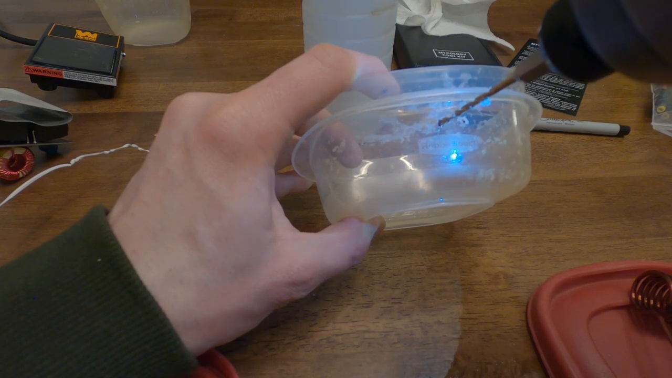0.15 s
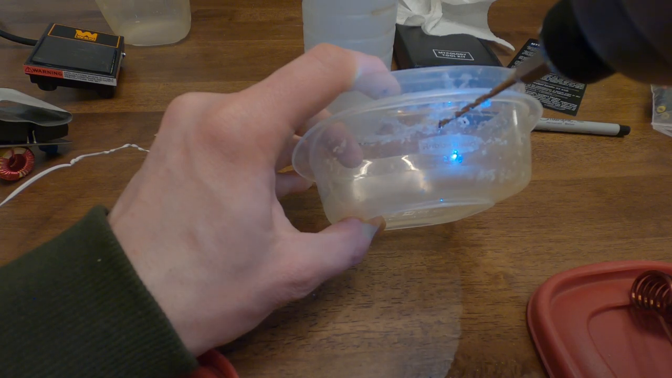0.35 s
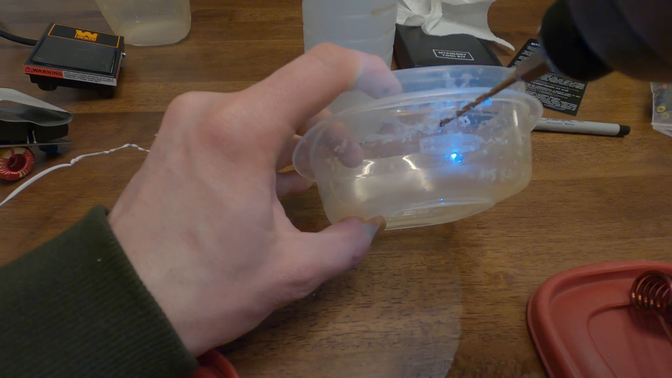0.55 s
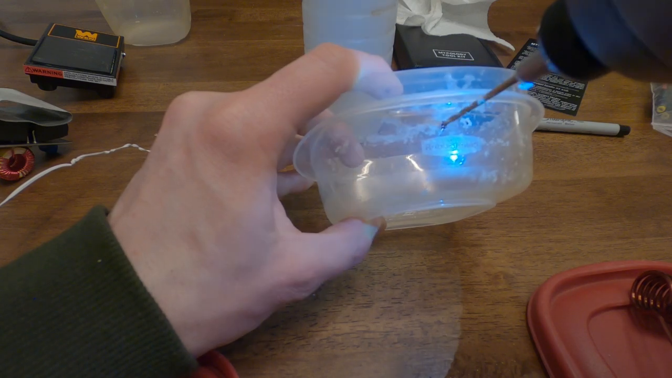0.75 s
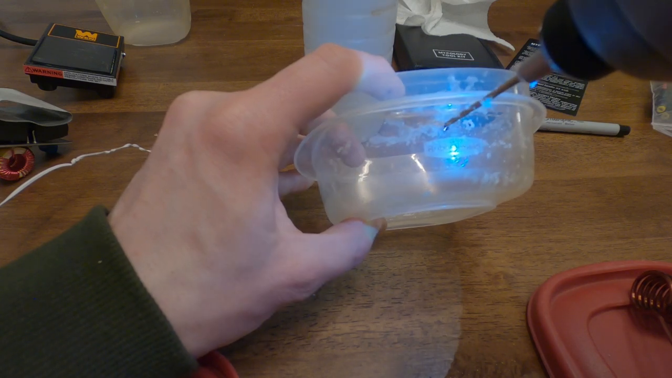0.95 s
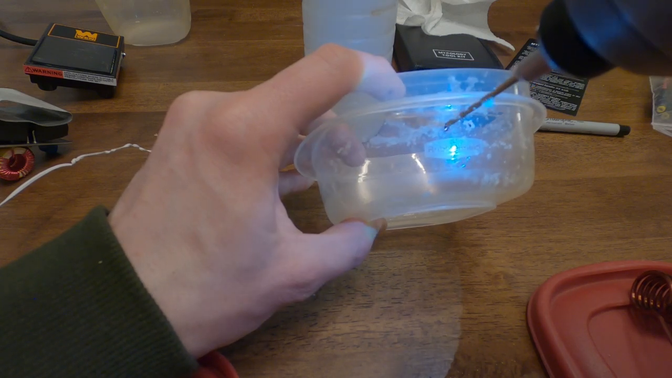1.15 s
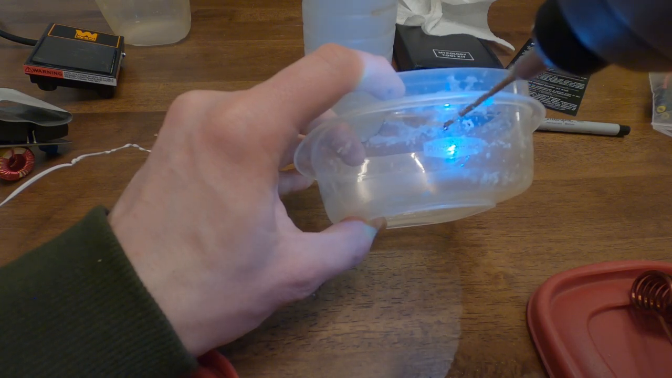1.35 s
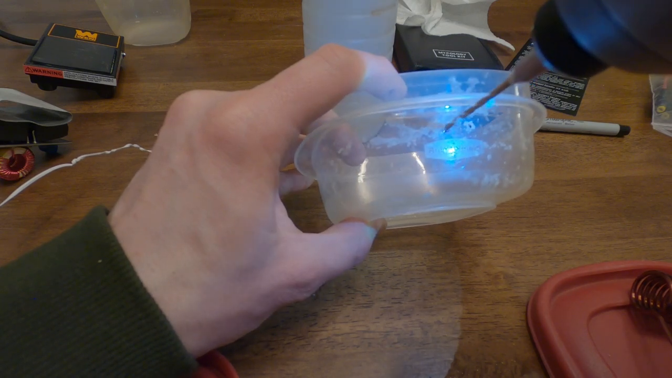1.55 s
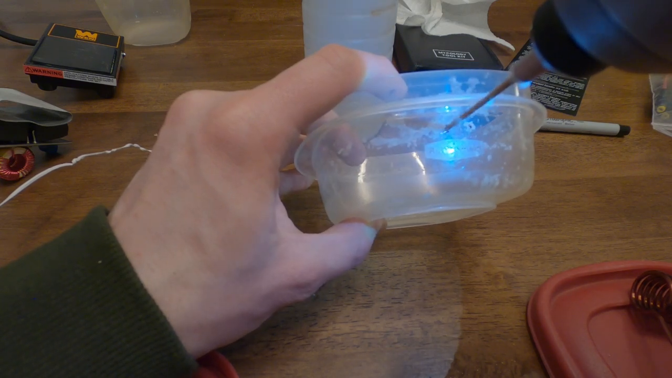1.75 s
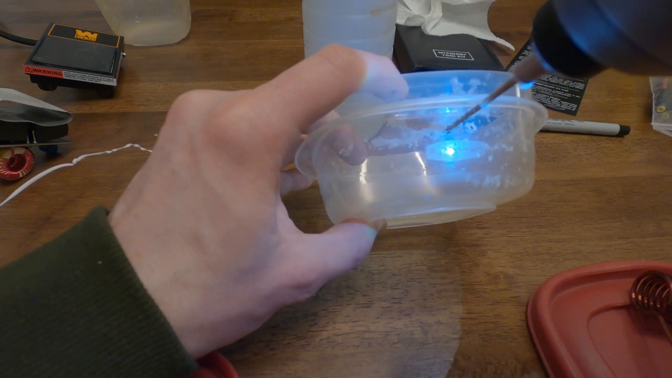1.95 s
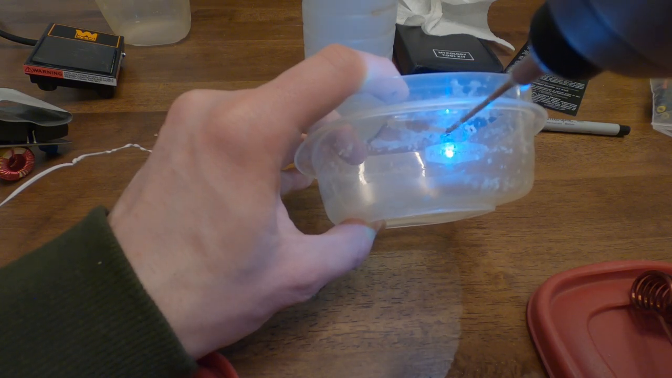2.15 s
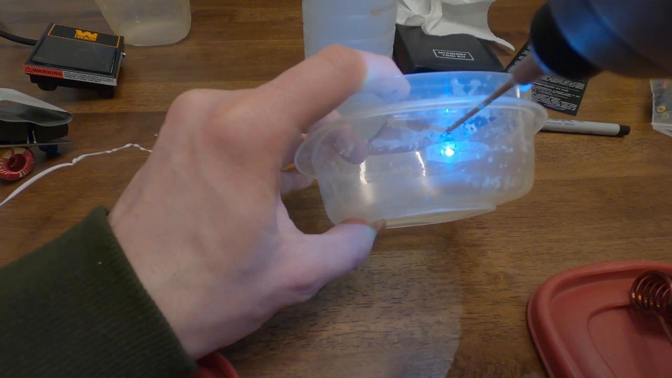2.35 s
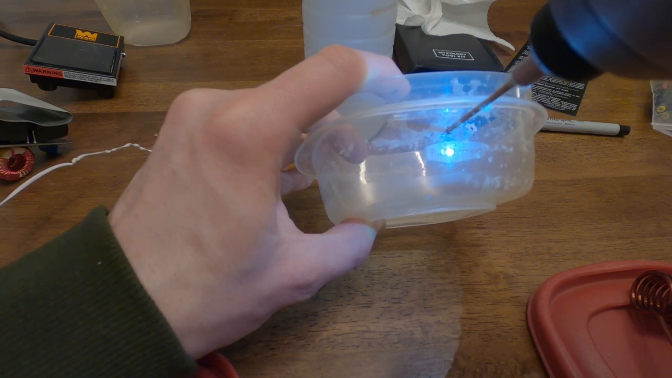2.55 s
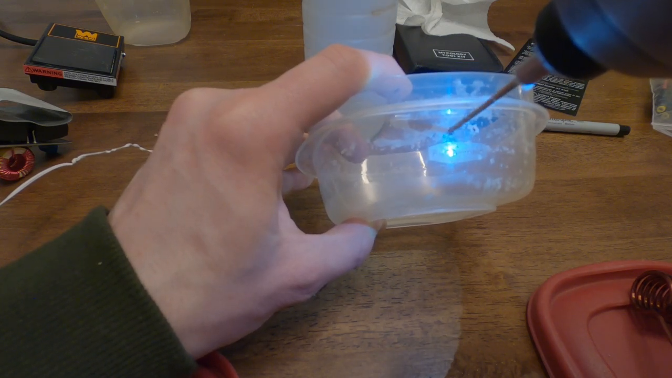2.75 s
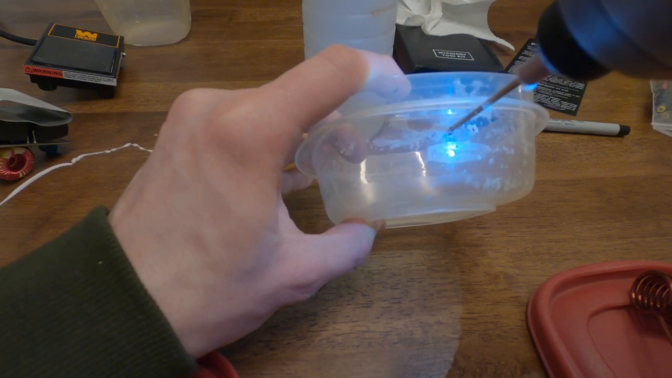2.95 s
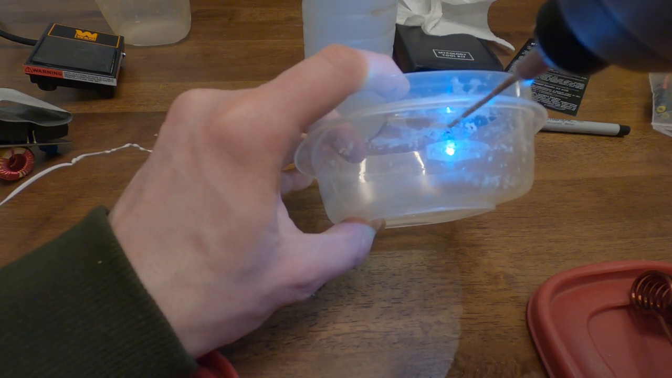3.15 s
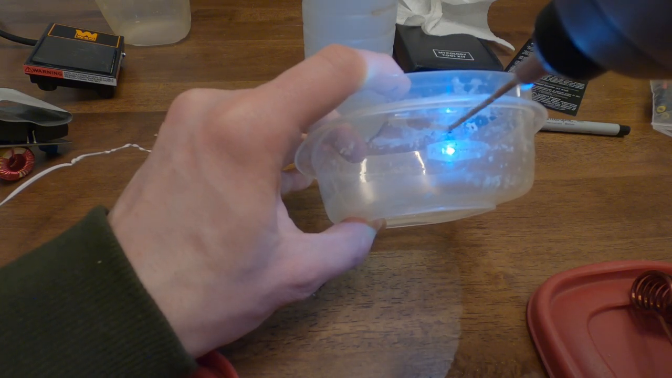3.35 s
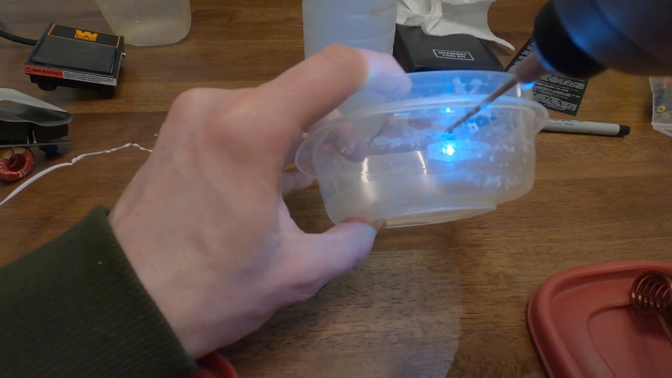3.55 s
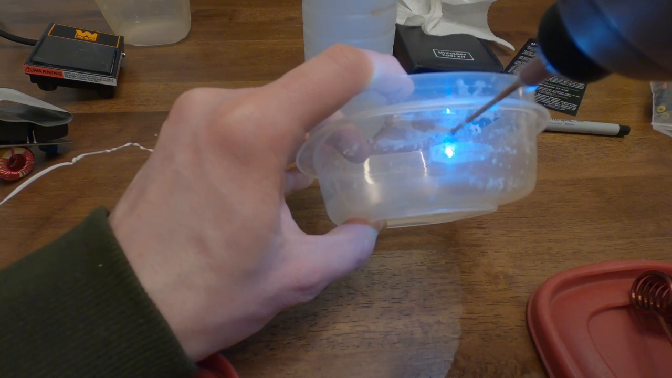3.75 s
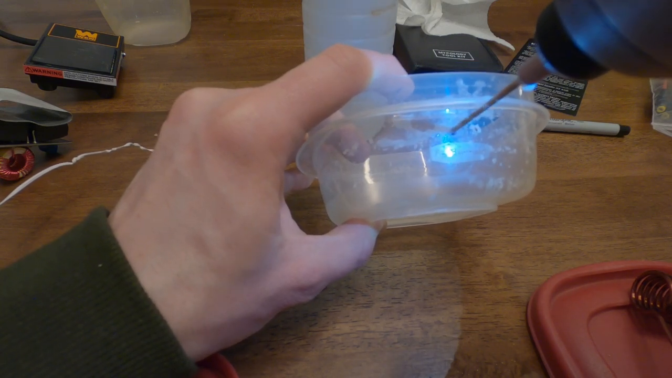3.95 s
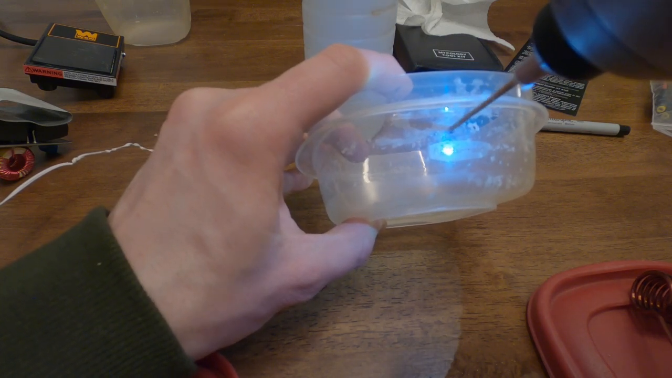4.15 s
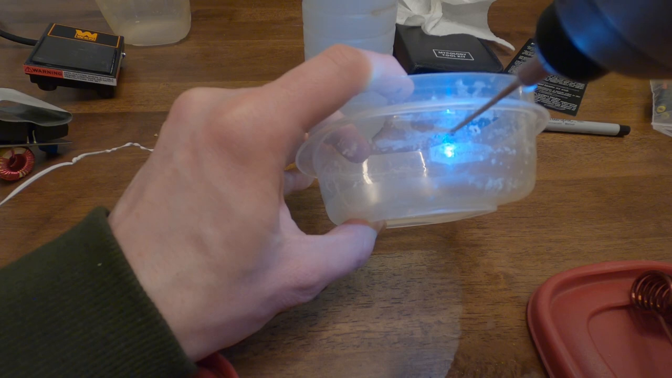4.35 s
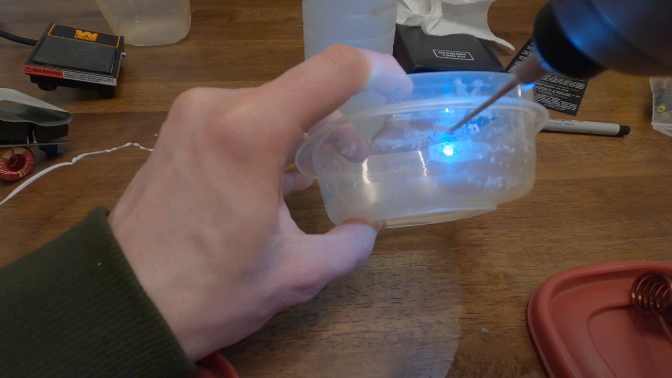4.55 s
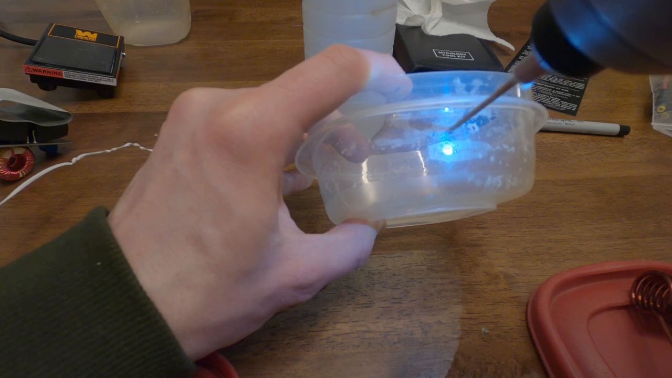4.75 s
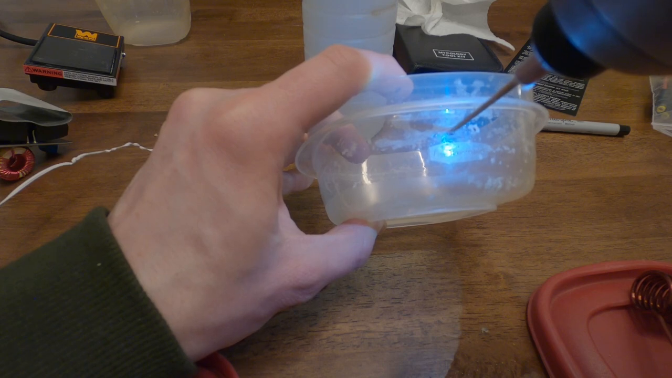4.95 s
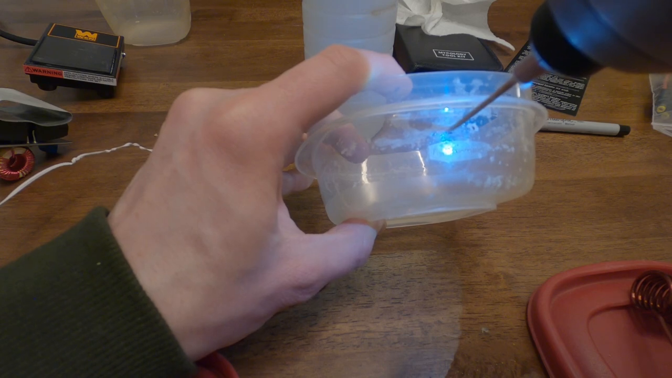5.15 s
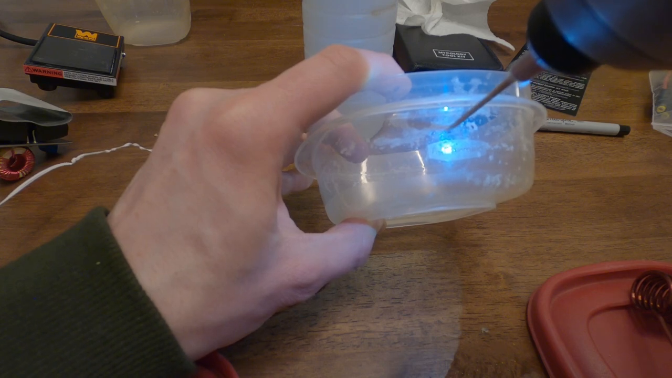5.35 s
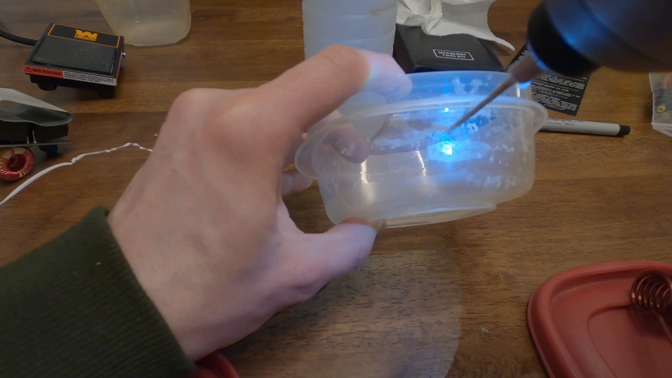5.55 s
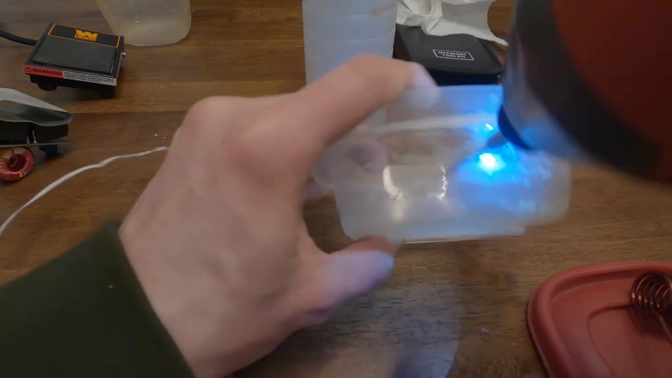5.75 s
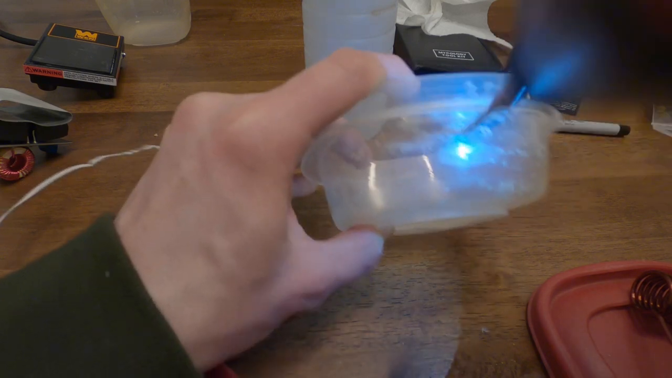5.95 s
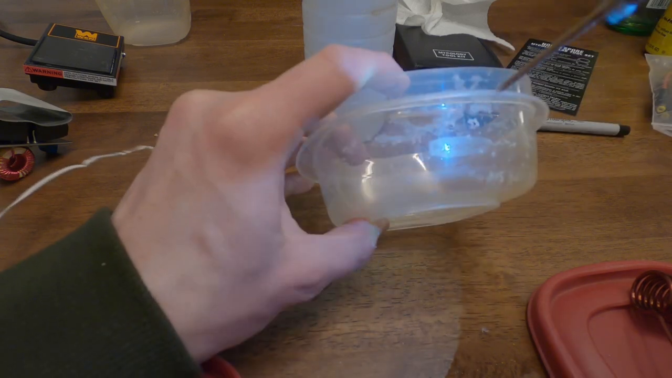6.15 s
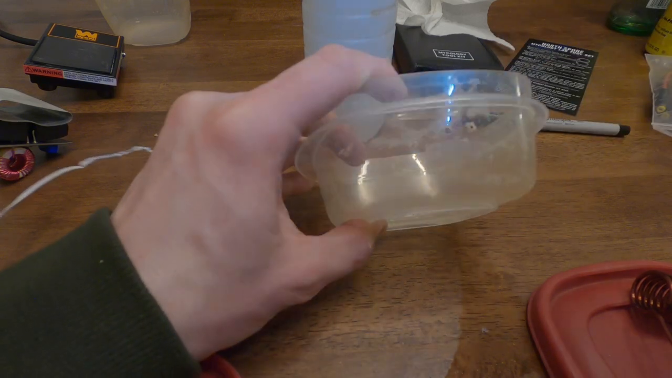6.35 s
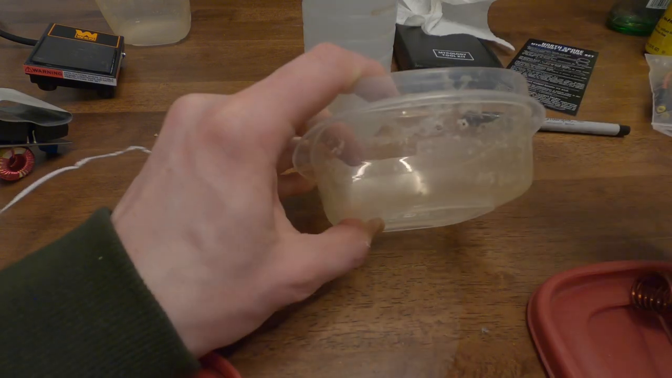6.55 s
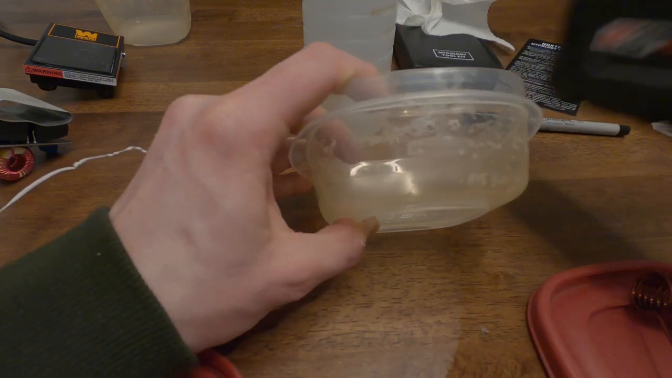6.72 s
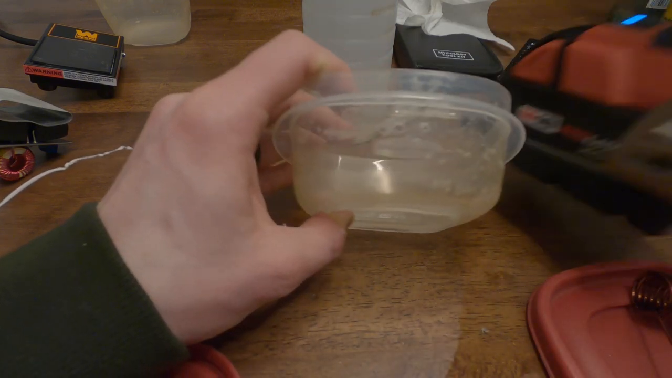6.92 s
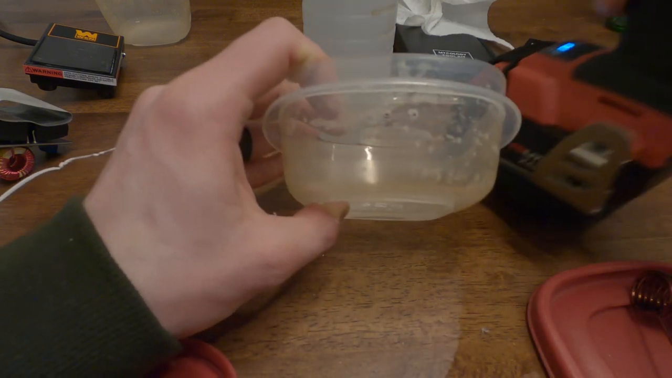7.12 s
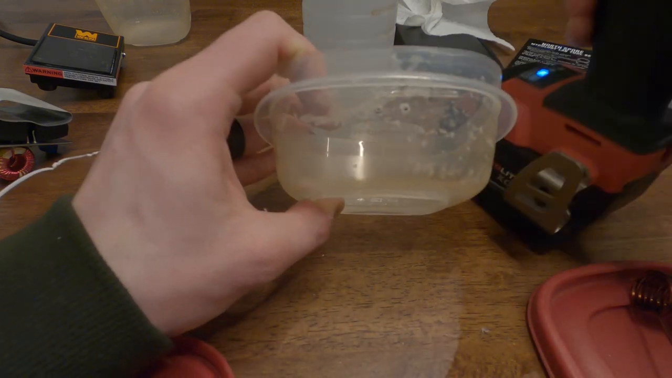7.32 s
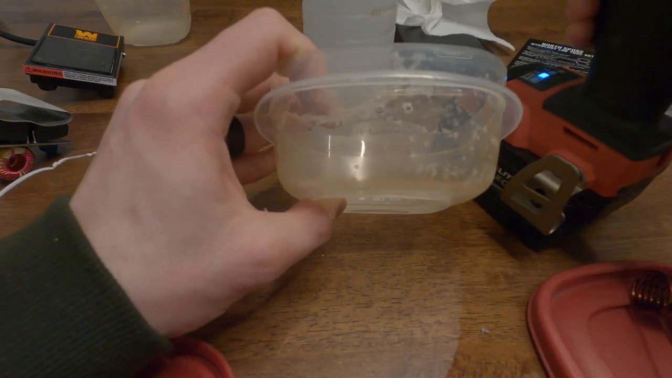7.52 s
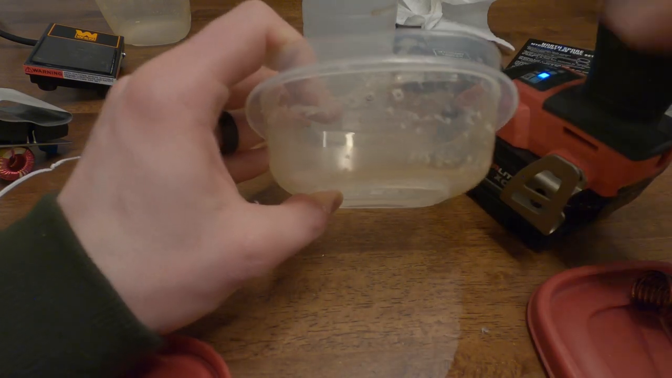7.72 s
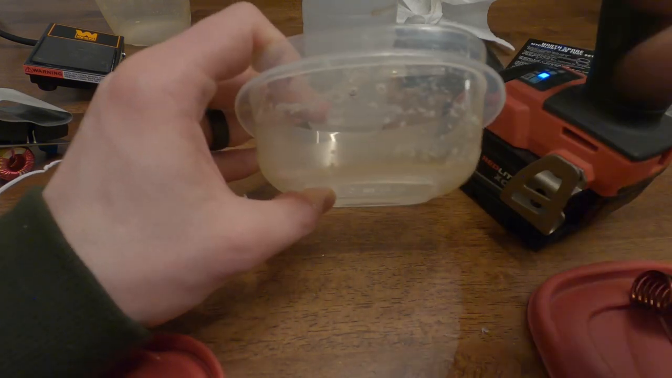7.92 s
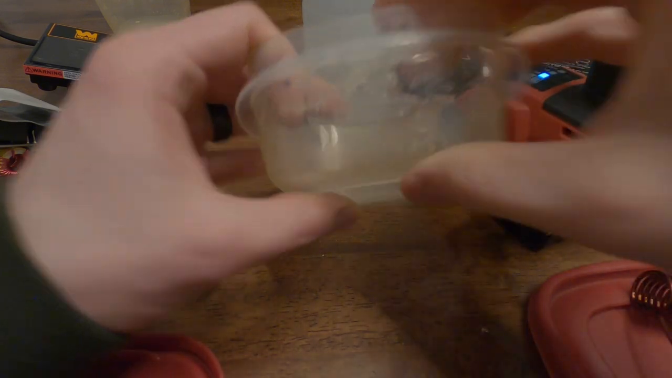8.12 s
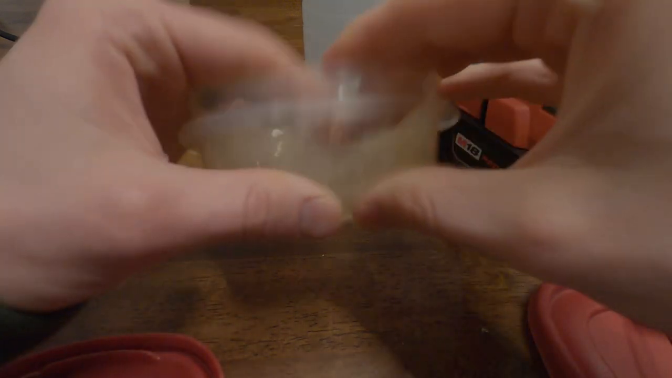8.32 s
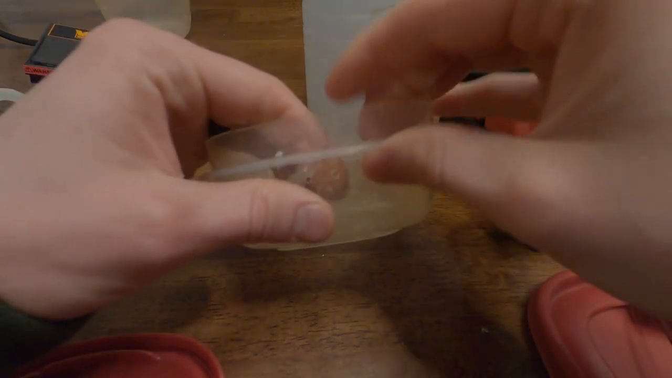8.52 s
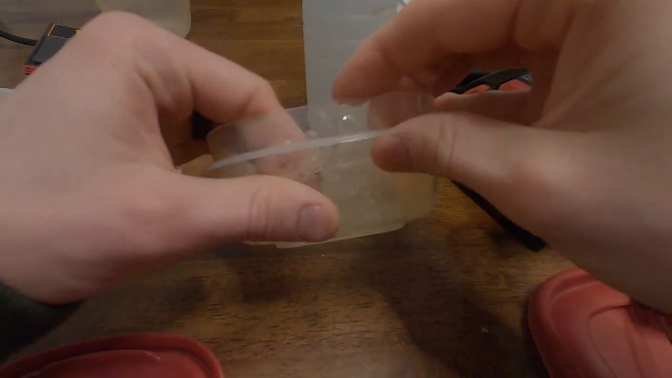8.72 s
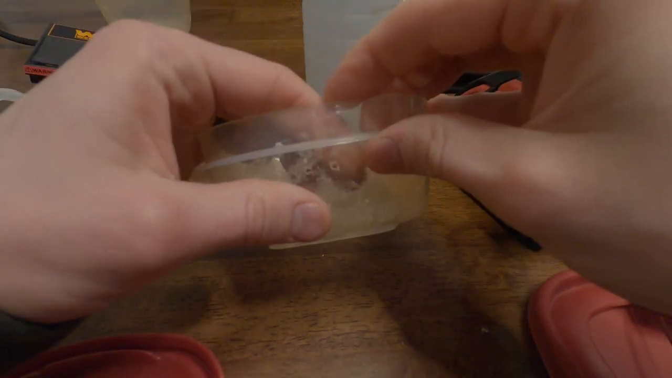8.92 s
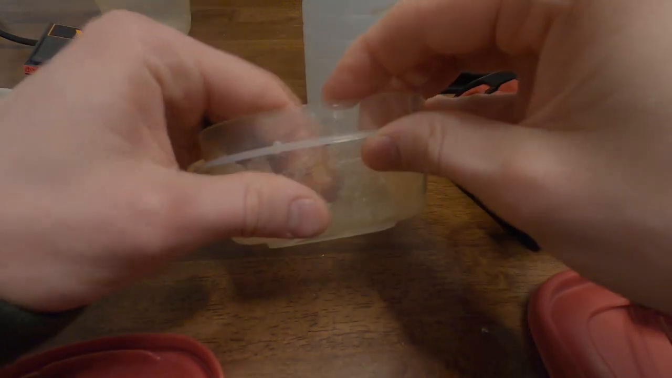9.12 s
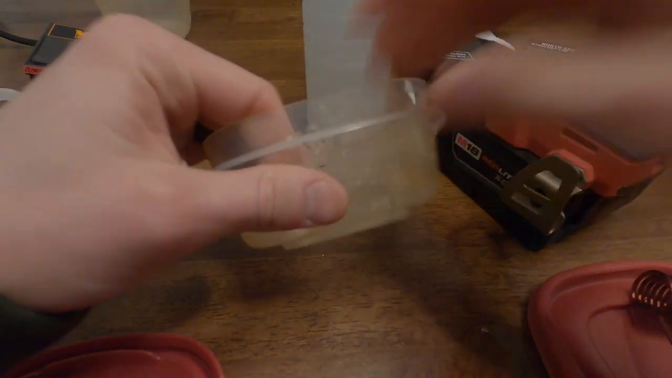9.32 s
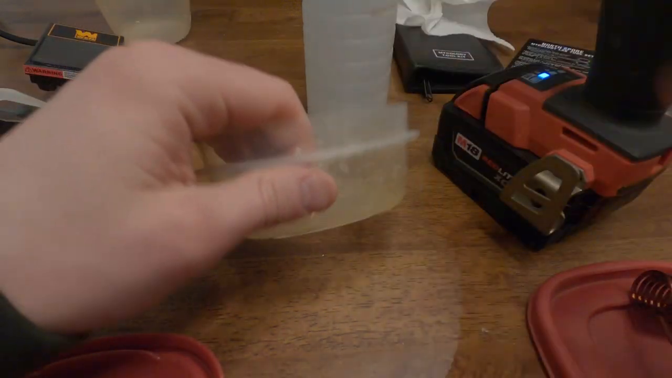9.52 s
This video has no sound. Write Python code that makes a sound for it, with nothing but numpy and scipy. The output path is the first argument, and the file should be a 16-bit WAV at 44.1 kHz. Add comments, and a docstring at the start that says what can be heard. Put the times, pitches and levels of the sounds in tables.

```python
"""Cordless drill boring a plastic tub

A drill bores a thin plastic tub in three trigger steps, close to a pair of microphone ports.
Gear teeth rattle in the casing as shaped noise; shaft orders and the switching tone are sines that
follow the speed; cooling air buffets the ports as low noise. The bit breaks through, the drill brakes
and is set on the table; fingers rub and tap the tub as noise and impulses through its resonances.
"""
import sys
import numpy as np
from scipy import signal
from scipy.fft import rfft, irfft, next_fast_len
from scipy.io import wavfile
from scipy.ndimage import map_coordinates

SR = 44100
rng = np.random.default_rng(int(sys.argv[2]) if len(sys.argv) > 2 else 0)


def int16_out(signal):
    """Quantize to a 16-bit WAV file."""
    q = np.round(np.clip(np.atleast_2d(signal).T, -1, 1) * 32767)
    wavfile.write(sys.argv[1], SR, q.astype(np.int16))


N = 422478

# Room murmur and microphone hiss: (frequency [Hz], gain [dB per Hz])
ROOM_COLOUR = [(12, -33), (25, -3.5), (58, -7.5), (88, -13), (122, -0.5), (150, -6), (220, -3.5),
               (330, -10), (450, -19), (700, -26.5), (2900, -37.5), (5100, -42.5), (9000, -53.5),
               (15600, -64.5)]
# Its course: (time [s], level [dB])
ROOM_LEVEL = [(0, -68.5), (1.5, -72), (4.45, -64), (5.9, -72), (6.48, -68.5), (6.96, -58), (7.26, -62.5),
              (7.47, -63.5), (8.14, -71), (9.58, -69)]
# Likeness of the ports: (frequency [Hz], left-right correlation [0-1])
PORT_LIKENESS = [(60, 0.93), (300, 0.94), (1400, 0.91), (3000, 1), (6000, 0.71), (10000, 0.31),
                 (15000, .05)]
# Balance of the ports: (frequency [Hz], left minus right [dB])
PORT_LEAN = [(60, -12.5), (110, -6), (200, -3.5), (380, -3.5), (700, -4), (1290, -0.5), (2380, 0.0),
             (4400, -1), (8120, -5), (15000, -18.5)]
LAG_S = 3 / SR  # the left port is farther from the work
TOP_HZ = 15600

# Narrow hisses: (centre [Hz], width [Hz], course [(time [s], level [dB]), ..])
WHEEZES = [(2250, 280, [(5.68, -51), (5.73, -44), (5.79, -43.5), (5.82, -71)]), (1520, 74, [(5.9, -69),
           (5.97, -53.5), (6.3, -64), (6.35, -76), (6.62, -76.5), (6.7, -89)]), (4740, 160, [(7, -100),
           (7.15, -86), (7.38, -84), (7.42, -100)]), (2990, 62, [(.74, -69.5), (1.66, -64.5), (1.8, -74)]),
           (4560, 195, [(6.2, -73), (6.3, -66), (6.4, -79), (6.62, -89)]), (2140, 120, [(0, -92.5),
           (9.58, -91)]), (3030, 60, [(0, -96), (6.3, -96.5), (8, -105), (9.58, -99)])]

# Skin on plastic: (frequency [Hz], gain [dB per Hz])
SKIN_COLOUR = [(600, -14.5), (1000, -1.5), (1500, -5.5), (1850, -1), (2050, -6), (2320, -2), (2700, -7),
               (3300, -6), (4300, -6), (6900, -7.5), (15000, -36.5)]
# Tub resonances: (centre [Hz], width [Hz], gain [dB])
TUB_MODES = [(390, 60, 2.5), (466, 150, -0.5), (900, 71, 1), (1015, 130, -6), (1248, 180, -9.5),
             (2370, 240, -30)]
# Tub rim resonances: (centre [Hz], width [Hz], gain [dB])
RIM_MODES = [(1190, 500, -4.5), (2290, 610, 0.5), (3160, 330, 3), (4600, 2700, -2), (8000, 3200, -3.5)]
# Table resonances: (centre [Hz], width [Hz], gain [dB])
TABLE_MODES = [(125.4, 103, -8.5), (195.4, 64, 2.5), (257, 38, 3), (382, 76, -7.5)]
# Table boom: (centre [Hz], width [Hz], gain [dB])
BOOM_MODES = [(37.6, 6.8, 0.5)]
# Finger strokes: (peak [s], rise [s], fall [s], rub [dB], tub [dB], crackle centre [Hz])
STROKES = [(.2, .02, 0.17, -81, -88, 2190), (.502, .01, 0.043, -82, -86, 2280),
           (.73, 0.069, 0.0053, -76.5, -86, 3000), (6.92, 0.045, .08, -79, -57, 3500),
           (6.97, 0.077, 0.031, -83, -58, 3500), (7.29, .2, 0.24, -80, -75, 2000),
           (7.44, 0.024, 0.063, -76, -60, 3200), (7.55, .03, 0.053, -90, -61, 1500),
           (7.86, 0.023, 0.058, -78, -91, 3480), (7.895, 0.059, 0.034, -74.5, -79, 2400),
           (8.2, 0.066, 0.064, -68, -88, 1400), (8.248, 0.07, 0.028, -63.5, -88, 1890),
           (8.34, 0.14, 0.053, -69, -87, 6450), (8.445, 0.051, 0.071, -60.5, -69, 3330),
           (8.62, 0.08, 0.046, -77, -68, 1100), (8.672, 0.028, 0.022, -64.5, -61, 2400),
           (8.71, 0.021, 0.054, -63, -65, 2400), (8.96, 0.16, 0.059, -75.5, -79.5, 1500),
           (9.22, 0.07, .025, -70.5, -66, 2300), (9.287, .05, .025, -69.5, -90, 2350),
           (9.35, 0.057, 0.11, -68, -54.5, 3800), (9.43, 0.056, 0.11, -73.5, -56.5, 4200),
           (9.56, .1, 0.15, -76, -60, 2300)]
# Taps and ticks: (time [s], tick level [dB], knock of the tub re tick [dB])
TAPS = [(0.2254, -59, -9), (0.5023, -48, -21), (0.7382, -36, -38), (0.7547, -31, -25.5), (5.7934, -42, -5),
        (7.4164, -53, 7), (7.4295, -41.5, 4.5), (7.4799, -55, 8), (7.5284, -52, 9), (7.5373, -50, 9.5),
        (8.1339, -47.5, -18.5), (8.1519, -47.5, -10), (8.1918, -47, -10), (8.462, -44, -15),
        (8.529, -56, -22), (8.6208, -44, 23), (8.6677, -39.5, -16), (8.7096, -42, -14),
        (9.2219, -34.5, -25), (9.2873, -48, -22), (9.3084, -59.5, 19.5), (9.396, -62, 18)]
# Table thuds: (time [s], thud level [dB], boom re thud [dB])
THUDS = [(5.729, -15.5, -22.5), (7.414, -19, -22.5), (7.471, -42.5, 2.5), (7.525, -22.5, -16.5),
         (8.19, -39, -24), (8.464, -39.5, -20)]
SOFT_HZ, NAIL_HZ = 800, 7030  # corners above which table contact and ticks are soft
CRACKLES_PER_S, CRACKLE_Q = 500, 2.5

# Speed at the three trigger steps: [turns per s]
STEP_TURNS_PER_S = (39, 108, 305)
# Trigger moves: (time [s], new speed [turns per s], slow share [0-1], time constant of the rest [s])
TRIGGER = [(.74, 39, .35, .015), (1.665, 108, .4, .039), (4.18, 306, .265, .04), (5.775, 258, 0, .11),
           (6.24, 0, 0, .64)]
CREEP_S, STOP_S = .19, 6.33  # time constant of the slow share; the brake grips

# Cooling air at each trigger step: [dB]
AIR_DB = (-69, -63.5, -51)
# Air reaching the ports: (time [s], relative level [dB])
DRAUGHT = [(.74, -3.5), (5.72, -1), (5.8, -17), (5.95, -2), (6, -3), (6.1, 2), (6.22, -27), (6.35, -38)]
# Buffeting: (frequency [Hz], gain [dB per Hz])
BUFFET_COLOUR = [(12, -34), (20, -10), (65, 0), (172, -12), (274, -29), (300, -23), (390, -37.5),
                 (660, -120)]
# Vent sweeping over the right port: (time [s], level [dB], edge noise re it [dB])
JET = [(5.62, -83, 2), (5.74, -43, 0), (5.768, -69, -5), (5.796, -38, 1), (5.82, -37, 1),
       (5.885, -37, -5.5), (5.9, -45, -9), (5.99, -46.5, -8), (6.02, -63, -12), (6.2, -78, -16)]
# Low part and edge part of the jet: (frequency [Hz], gain [dB per Hz])
JET_LOW_COLOUR = [(50, -11.5), (150, -3.0), (330, 4), (450, -2), (700, -21.5), (1500, -64.5), (3000, -100)]
JET_EDGE_COLOUR = [(300, -39.5), (600, -0.5), (1000, -2), (1600, -13), (3000, -23.5), (7000, -85.5)]
# Sudden blows of air on the port: (time [s], level [dB])
SLAPS = [(5.694, -31), (5.736, -31.5), (5.793, -24), (5.815, -25.5), (5.833, -20), (5.852, -24),
         (5.868, -27), (5.887, -33)]
GUST_DB = 2

# Shaft orders: [multiples of the speed]
SHAFT_ORDERS = (4, 5.04, 5.29, 6, 7, 10, 12, 13, 16, 24, 24.4, 24.9, 36.7, 43)
# Level of each order, one row per order: (step 1 [dB], step 2 [dB], step 3 [dB])
SHAFT_DB = [(-92, -80.5, -64.5), (-97, -95, -60), (-113, -86.5, -65), (-89, -72, -65.5),
            (-94, -93.5, -64.5), (-101, -87, -64), (-73, -82.5, -59.5), (-85, -100, -48.5),
            (-101, -82.5, -59.5), (-79.5, -94, -74), (-89, -89.5, -71), (-86, -82, -66.5),
            (-102, -84.5, -87.5), (-72, -82, -86)]
SWITCH_HZ = 7985
# Switching tone and side tones: (offset [multiples of the speed], step 1 [dB], step 2 [dB], step 3 [dB])
SWITCHING = [(-8, -85, -95, -95), (-4, -69, -71, -90), (0, -85, -84, -95), (4, -72, -73, -69),
             (8, -88, -87, -95)]
# Blurred orders that flare: (multiple of the speed, course [(time [s], level [dB]), ..])
SURGES = [(16, [(4.185, -60), (4.21, -43), (4.225, -52), (4.25, -60)]), (6, [(4.22, -60), (4.27, -47),
          (4.33, -44), (4.42, -49), (4.48, -64)]), (24.5, [(4.22, -70), (4.3, -63), (4.5, -68)]),
          (36.7, [(5.8, -76), (5.9, -72), (6.3, -78)]), (24.5, [(5.8, -72), (6, -66), (6.2, -63),
          (6.32, -68)]), (13, [(5.95, -72), (6.1, -64), (6.32, -61)])]
# Whistles independent of the speed, one list each: (time [s], frequency [Hz], level [dB])
SQUEALS = [
    [(1.72, 2650, -80), (1.8, 2900, -62), (1.9, 3150, -62), (2, 3270, -68), (2.15, 3310, -70),
     (2.6, 3260, -72), (3.3, 3190, -72), (3.5, 3170, -85)],
    [(2.1, 2985, -80), (2.22, 2988, -58), (3, 3037, -57), (3.45, 3105, -55), (3.7, 3080, -56),
     (4.04, 3000, -57), (4.17, 3012, -54), (4.21, 3000, -49), (4.27, 3020, -75)],
    [(6.33, 4420, -90), (6.47, 4440, -86), (6.52, 4490, -78), (6.58, 4430, -79), (6.61, 4330, -77),
     (6.625, 4280, -95)],
]
# Swells of a low wavering hum: (peak [s], rise [s], fall [s], level [dB])
DRONE = [(3.05, 0.69, 0.55, -55), (3.86, 0.54, 0.82, -53.5)]

# Casing resonances: (centre [Hz], width [Hz], gain [dB])
CASING_MODES = [(1626, 91, 4), (2183, 53, -5.5), (3022, 160, -5)]
# Drill nose resonances: (centre [Hz], width [Hz], gain [dB])
NOSE_MODES = [(3743, 260, 3), (4450, 1100, 0), (5500, 880, 0.5), (6600, 400, -0.5), (7424, 210, 5),
              (8360, 930, -8)]
# Tub wall under the bit: (centre [Hz], width [Hz], gain [dB])
WALL_MODES = [(1317, 259, -3.5), (1456, 175, 1), (2736, 340, -7.5), (3405, 590, -9)]
# Parts chattering with the carrier: (centre [Hz], width [Hz], gain [dB])
CHUCK_MODES = [(4360, 280, -3), (5246, 120, 3), (6000, 200, 3)]
# Treble fizz: (frequency [Hz], gain [dB per Hz])
FIZZ_COLOUR = [(5470, -30.5), (9300, -4), (10000, -5), (12000, -6), (12900, -14), (14600, -20.5),
               (15600, -28.5)]
# Scrape of the bit: (frequency [Hz], gain [dB per Hz])
CUT_COLOUR = [(200, -1), (400, 1), (800, 3), (1500, 3.5), (2600, 2.5), (5000, -4), (9000, -64)]
# Gear rattle: (time [s], level [dB])
RATTLE = [(.745, -55), (.8, -59), (.95, -54.5), (1.64, -54.5), (1.69, -47.5), (4.16, -48.5), (4.3, -42.5),
          (4.5, -45), (5.79, -44.5), (5.87, -62), (5.93, -48), (6.13, -43.5), (6.33, -45), (6.35, -60.5),
          (6.52, -69.5), (6.7, -86)]
# Drill turning away from the ports, then stopping: (time [s], treble level change [dB])
AWAY = [(5.79, 0.5), (5.815, -7), (5.87, -8.5), (5.95, -6.5), (6.13, -5.5), (6.3, -7.5), (6.35, -20),
        (6.42, -32), (6.52, -54), (6.7, -58)]
# Slow gear teeth catching: (time [s], level [dB])
KNOCKS = [(0.8003, -37.5), (0.8512, -36.5), (0.889, -41), (0.9222, -47.5), (0.973, -45), (1.0368, -37.5),
          (1.0824, -39), (1.1407, -30), (1.213, -39), (1.268, -34), (1.384, -36), (1.45, -39),
          (1.556, -39.5), (1.5856, -33)]
# Unevenness of the rattle at each trigger step: [dB]
LUMPS_DB = (3.5, 1.54, 1.5)
# Beat of the gear carrier: (multiple of its speed, relative depth [dB], phase [rad])
CHATTER = [(.5, 1.13, .9), (1, 3.3, 1.8), (2, 2.6, -2.1)]
# Share of that beat at each trigger step: [0-1]
BEAT_SHARE = (0.17, 0.37, 0.24)
# Tub wall at each trigger step: [dB re the rattle table]
WALL_DB = (-5, -2.5, -5)
# Chattering parts at each trigger step: [dB re hiss]
CHUCK_DB = (-7, -4, -10)
# At each trigger step [dB]
HISS_DB, FIZZ_DB, CUT_DB = (-62.5, -53, -48), (-85.5, -69.5, -62.5), (-75, -60.5, -54.5)
CARRIER_RATIO = .2435  # turns of the first gear carrier per motor turn
BITE_S, BITE_DB_PER_S = (1.59, 3.64), 2.5  # the scrape grows while the bit sinks in
THROUGH_S, LOOSE_DB = 5.8, -4  # the bit breaks through; the wall rattles less
FIZZ_LOSS, CUT_LOSS, TONE_LOSS = 2.04, 0.96, 1.2  # dB per dB of AWAY
DULL_HZ, DULL_WIDTH_HZ, DULLING = 7400, 450, 1.6  # nose ring that loses more [dB per dB of AWAY]


def amp(db):
    """Amplitude of a level in dB."""
    return 10 ** (np.asarray(db) / 20)


def unit(x):
    """x at rms 1."""
    return x / np.sqrt(np.mean(x ** 2) + 1e-20)


def curves(rows):
    """One value per sample for each column after the time, and a gate open inside the table."""
    s, *cols = np.transpose(rows)
    t = np.arange(N) / SR
    gate = np.clip(np.minimum(t - s[0], s[-1] - t) / 0.0035, 0, 1)
    return [np.interp(t, s, c) for c in cols] + [gate]


def swells(rows):
    """Per dB column, the sum of swells that climb 20 dB over the rise and sink 20 dB over the fall."""
    t = np.arange(N) / SR
    total = 0
    for peak_s, rise_s, fall_s, *db in rows:
        shape = amp(-20 * np.maximum((peak_s - t) / rise_s, (t - peak_s) / fall_s))
        total = total + shape * amp(db)[:, None]
    return total


def wobble(knots_per_s):
    """A smooth random curve."""
    knots = rng.standard_normal(int(N * knots_per_s / SR) + 4)
    return map_coordinates(knots, [np.arange(N) * knots_per_s / SR])


def filtered(x, response):
    """x times a complex response of frequency."""
    m = next_fast_len(N + SR // 2)
    return irfft(rfft(x, m) * response(np.fft.rfftfreq(m, 1 / SR)), m)[..., :N]


def along(points, hz):
    """(Hz, value) points on a log axis."""
    f, v = np.transpose(points)
    return np.interp(np.log(hz + 1), np.log(f + 1), v)


def colour(points):
    """Gain of a (Hz, dB) spectrum."""
    return lambda hz: amp(along(points, hz))


def body(modes):
    """Response of (Hz, width, dB) resonances, alternating in sign."""
    def response(f):
        total = 0
        for k, (c, w, db) in enumerate(modes):
            total = total + (-1) ** k * amp(db) * 1j * f * w / (c * c - f * f + 1j * f * w)
        return total
    return response


def grit(response, lumps_db, fast=60):
    """Two unrelated noise streams of contacts with shared uneven strength, through a response, rms 1."""
    lumps = amp(lumps_db * (wobble(fast) + 0.31 * wobble(12)))
    return unit(filtered(unit(lumps) * rng.standard_normal((2, N)), response))


def strike(t, db, decay_s, attack_s):
    """Envelope of a blow: exponential attack, 60 dB of decay in decay_s."""
    return amp(db - 60 * t / decay_s) * (1 - np.exp(-t / attack_s))


def tone(hz, db, blur_hz, waver_db):
    """A sine of rms db, unsteady in pitch and level."""
    phase = 2 * np.pi * np.cumsum(hz + blur_hz * wobble(40)) / SR
    return np.sqrt(2) * amp(db + waver_db * wobble(9)) * np.sin(phase)


def ports(pair, lean, lag_s=LAG_S, alike=1):
    """A direct and a diffuse stream reach two ports: later on the left, less alike in the treble."""
    def paths(hz):
        turn = np.arccos(np.clip(alike * along(PORT_LIKENESS, hz), -1, 1)) / 2
        half_db = lean * along(PORT_LEAN, hz) / 2
        left = amp(half_db) * np.exp(-2j * np.pi * hz * lag_s)
        right = amp(-half_db)
        return np.array([[left * np.cos(turn), left * np.sin(turn)],
                         [right * np.cos(turn), -right * np.sin(turn)]])
    return filtered(pair, paths).sum(axis=1)


def echo(x, t60_s):
    """A short, dulling tail from table and walls: convolution with decaying coloured noise."""
    t = np.arange(SR // 5) / SR
    noise = rng.standard_normal((2, len(t))) * amp(-60 * t / t60_s)
    tail = filtered(noise, colour([(100, 10.0), (3000, -8), (12000, -19.0)]))[:, :len(t)]
    return signal.fftconvolve(x[None], tail / np.linalg.norm(tail[0]), axes=1)[:, :N]


def room():
    """The low murmur of the room and the hiss of the microphones, as one coloured noise."""
    level = amp(curves(ROOM_LEVEL)[0] + 0.5)
    return ports(level * grit(colour(ROOM_COLOUR), 1.0, fast=73), lean=.1, alike=0.97)


def wheezes():
    """Narrow bands of hiss: noise through single resonances."""
    bands = 0
    for hz, width_hz, rows in WHEEZES:
        db, gate = curves(rows)
        bands = bands + amp(db) * gate * grit(body([(hz, width_hz, 0)]), 1.6)
    return ports(bands, lean=.5)


def crackle():
    """The plastic snaps under each stroke: random impulses ring around the stroke's centre."""
    snaps = (rng.random(N) < CRACKLES_PER_S / SR) * amp(3.4 * rng.exponential(size=N))
    snaps = snaps * rng.choice([-1, 1], N)
    total = 0
    for row in STROKES:
        ring = body([(row[5], row[5] / CRACKLE_Q, 0)])
        total = total + swells([row[:4]])[0] * unit(filtered(snaps, lambda hz: ring(hz) ** 2))
    return total


def hands():
    """Skin rubs the tub and sets its walls humming; nails, rim and trigger tick; the table takes thuds."""
    rub, tub = swells([row[:5] for row in STROKES])
    snapping = crackle()
    strokes = rub * grit(colour(SKIN_COLOUR), 1.6, fast=110) + [snapping, 0.26 * snapping]
    strokes += tub * grit(body(TUB_MODES), 2.5)
    ticks, knocks, thuds, booms = np.zeros((4, N))
    t = np.arange(SR // 40) / SR
    for s, db, knock_db in TAPS:
        start = round(s * SR)
        ticks[start:][:len(t)] += strike(t, db + 9.5, 0.016, 0.0027) * rng.standard_normal(len(t))
        knocks[start] = amp(db + knock_db + 28)
    for s, db, boom_db in THUDS:
        thuds[round(s * SR)] = amp(db + 29.5)
        booms[round(s * SR)] = amp(db + boom_db + 59)
    hits = filtered(ticks, lambda hz: body(RIM_MODES)(hz) / (1 + 1j * hz / NAIL_HZ) ** 2)
    hits += filtered(knocks, body(TUB_MODES))
    table = filtered(thuds, body(TABLE_MODES)) + filtered(booms, body(BOOM_MODES))
    table = filtered(table, lambda hz: 1 / (1 + 1j * hz / SOFT_HZ) ** 2)
    near = ports(strokes + [hits, 0.3 * hits], lean=0.23)
    return near + table + amp(-13.0) * echo(hits, t60_s=0.2)


def spin():
    """Speed [turns per s]: each move is part quick, part slow creep, and holds from the brake on."""
    t, speed, old = np.minimum(np.arange(N) / SR, STOP_S), 0, 0
    for s, new, slow, quick_s in TRIGGER:
        age_s = np.maximum(t - s, 0)
        lagging = slow * np.exp(-age_s / CREEP_S) + (1 - slow) * np.exp(-age_s / quick_s)
        speed = speed + (new - old) * (1 - lagging)
        old = new
    return np.maximum(speed, 1)


def at_step(speed, values):
    """Values given at the trigger steps, read at the present speed on a log axis."""
    return np.interp(np.log(speed), np.log(STEP_TURNS_PER_S), values)


def jet():
    """The vent passes the port: low turbulence, edge noise and slaps of two decaying sines."""
    db, edge_db, gate = curves(JET)
    low = grit(colour(JET_LOW_COLOUR), 4.8, fast=46)[0]
    edge = grit(colour(JET_EDGE_COLOUR), 4.1, fast=120)[0]
    blast = gate * (amp(db + 3.0) * low + amp(db + edge_db) * edge)
    t = np.arange(SR // 30) / SR
    slap = np.sin(2 * np.pi * 340 * t) + 0.68 * np.sin(2 * np.pi * 950 * t)
    for s, slap_db in SLAPS:
        blast[round(s * SR):][:len(t)] += strike(t, slap_db + 1, 0.016, 0.0014) * slap
    return blast


def air(speed):
    """Cooling air buffets each port in its own way; the passing vent blows mostly into the right one."""
    db, gate = curves(DRAUGHT)
    db = db + at_step(speed, AIR_DB) + GUST_DB * wobble(7)
    a, b = grit(colour(BUFFET_COLOUR), 0.77, fast=9.1)
    steady = gate * amp(db) * np.array([1.9 * a + 0.57 * b, 0.98 * a - 0.31 * b])
    return steady + jet() * amp([[-22], [6]])


def motor(speed, running):
    """Shaft tones swell as they cross a casing resonance; the switching tone has speed side tones."""
    free_db = TONE_LOSS * curves(AWAY)[0]
    grid_hz = np.arange(0, 9000., 10)
    swell_db = 5 + 12 * np.log10(np.abs(body(CASING_MODES)(grid_hz)) + 0.35)
    tones = np.zeros(N)
    for k, step_db in zip(SHAFT_ORDERS, SHAFT_DB):
        db = at_step(speed, step_db) + free_db + np.interp(k * speed, grid_hz, swell_db)
        tones += tone(k * speed, db, blur_hz=k * (.45 - 0.11 * free_db), waver_db=2.24)
    # the shaft tones firm up as the motor takes load
    tones *= running * np.clip((np.arange(N) / SR - .78) / 0.13, 0, 1)
    for k, rows in SURGES:
        db, gate = curves(rows)
        tones += gate * tone(k * speed, db, blur_hz=2.5 * k, waver_db=1.2)
    for rows in SQUEALS:
        hz, db, gate = curves(rows)
        tones += gate * tone(hz, db, blur_hz=12, waver_db=2.5)
    tones += swells(DRONE)[0] * tone(81, 0, blur_hz=5.33, waver_db=3.0)
    switch = np.zeros(N)
    for k, *step_db in SWITCHING:
        db = at_step(speed, step_db) + free_db
        switch += tone(SWITCH_HZ + k * speed, db, blur_hz=3, waver_db=1.2)
    switch *= running * amp(2 * free_db)
    shaft = ports(np.array([tones, .2 * tones]), lean=0.36)
    return shaft + ports(np.array([switch, .2 * switch]), lean=0.88, lag_s=0.2 * LAG_S)


def tooth_knocks():
    """Slow gear teeth catch: short noise bursts ring the casing."""
    knocks, t = np.zeros(N), np.arange(SR // 30) / SR
    for s, db in KNOCKS:
        burst = strike(t, db + 12.5, 0.021, 0.0015) * rng.standard_normal(len(t))
        knocks[round(s * SR):][:len(t)] += burst
    return filtered(knocks, body(CASING_MODES))


def gears(speed):
    """Rattle, hiss and fizz of gears and fan, and the scrape of the bit: noise beating with the carrier."""
    rattle_db, gate = curves(RATTLE)
    away_db = curves(AWAY)[0]
    t = np.arange(N) / SR
    hiss_db = at_step(speed, HISS_DB) + away_db
    fizz_db = at_step(speed, FIZZ_DB) + FIZZ_LOSS * away_db
    bite_db = BITE_DB_PER_S * (np.clip(t, *BITE_S) - BITE_S[0])
    cut_db = at_step(speed, CUT_DB) + bite_db + CUT_LOSS * away_db
    loose_db = LOOSE_DB * np.clip((t - THROUGH_S) / .1, 0, 1)
    wall_db = rattle_db + at_step(speed, WALL_DB) + loose_db
    chuck_db = hiss_db + np.interp(speed, STEP_TURNS_PER_S, CHUCK_DB)
    # slow gears knock unevenly, fast ones blur
    lumps_db = np.interp(speed, STEP_TURNS_PER_S, LUMPS_DB)
    angle = 2 * np.pi * CARRIER_RATIO * np.cumsum(speed) / SR
    beat_db = sum(db * np.cos(k * angle + rad) for k, db, rad in CHATTER)
    beat_db = beat_db * np.interp(speed, STEP_TURNS_PER_S, BEAT_SHARE)

    noise = amp(rattle_db - 3.0 + 0.21 * beat_db) * grit(body(CASING_MODES), lumps_db)
    noise += amp(wall_db) * grit(body(WALL_MODES), 0.98 * lumps_db)
    noise += amp(hiss_db + 1.4 * beat_db) * grit(body(NOSE_MODES), 0.65 * lumps_db, fast=29)
    noise += amp(chuck_db + 3.2 * beat_db) * grit(body(CHUCK_MODES), .8)
    # the casing walls radiate little of the highest treble
    noise = filtered(noise, lambda hz: 1 / (1 + (hz / 10000) ** 8))
    dull_ring = filtered(noise, body([(DULL_HZ, DULL_WIDTH_HZ, 0)]))
    noise -= (1 - amp(DULLING * away_db)) * dull_ring
    noise += amp(fizz_db + .3 * beat_db) * grit(colour(FIZZ_COLOUR), 0.8 * lumps_db)
    noise += amp(cut_db) * grit(colour(CUT_COLOUR), 0.83)
    knocks = tooth_knocks()
    return ports(gate * noise + [knocks, .3 * knocks], lean=1)


def drill():
    """Cooling air, motor and gears follow one speed."""
    speed = spin()
    running = curves([(TRIGGER[0][0],), (STOP_S,)])[0]
    return air(speed) + motor(speed, running) + gears(speed)


def scene():
    """All sources at the two ports."""
    return room() + wheezes() + hands() + drill()


def record(dry):
    """Nothing is kept above the band limit."""
    return filtered(dry, lambda hz: hz < TOP_HZ)


dry = scene()
out = record(dry)
int16_out(out)
```